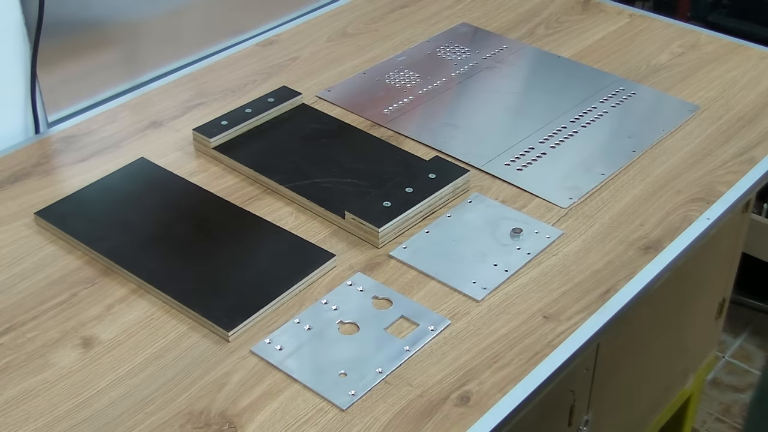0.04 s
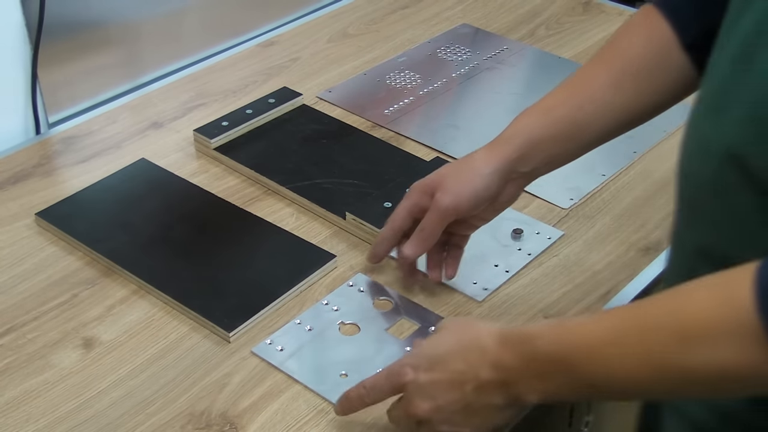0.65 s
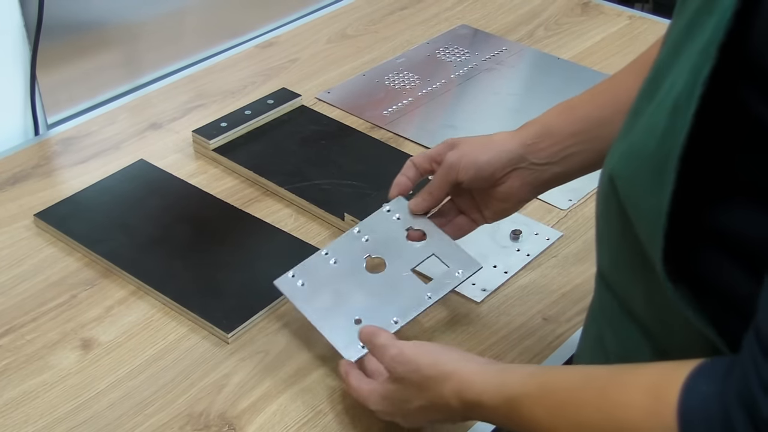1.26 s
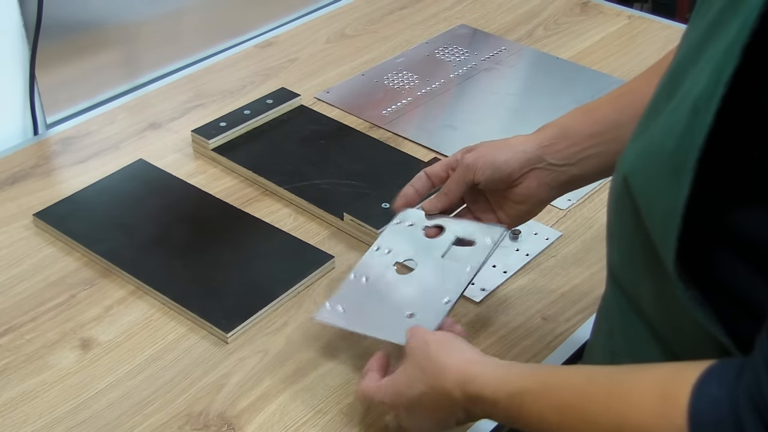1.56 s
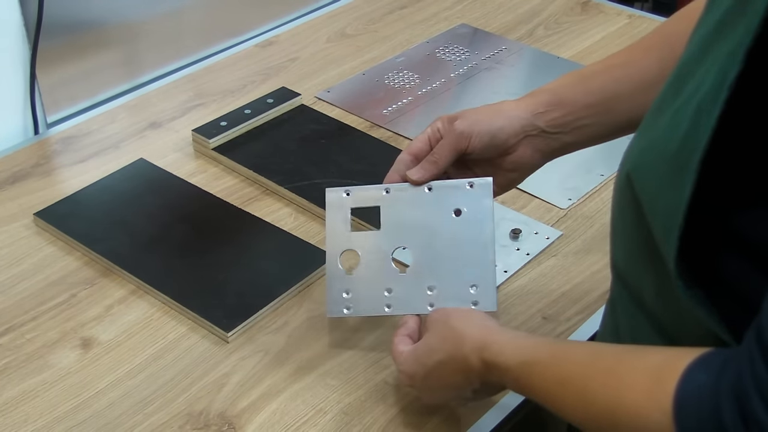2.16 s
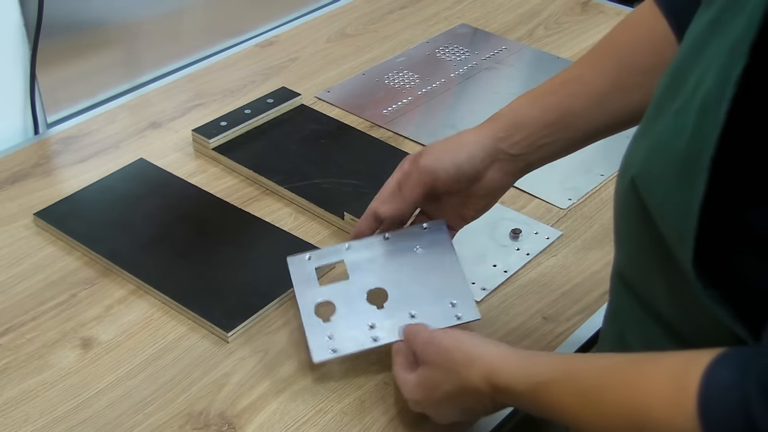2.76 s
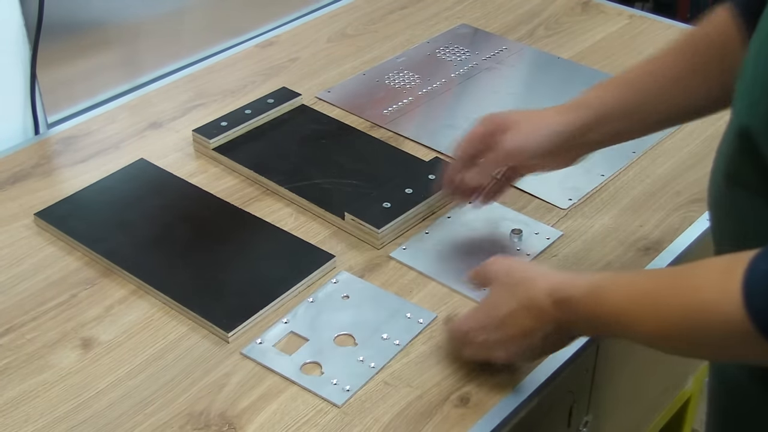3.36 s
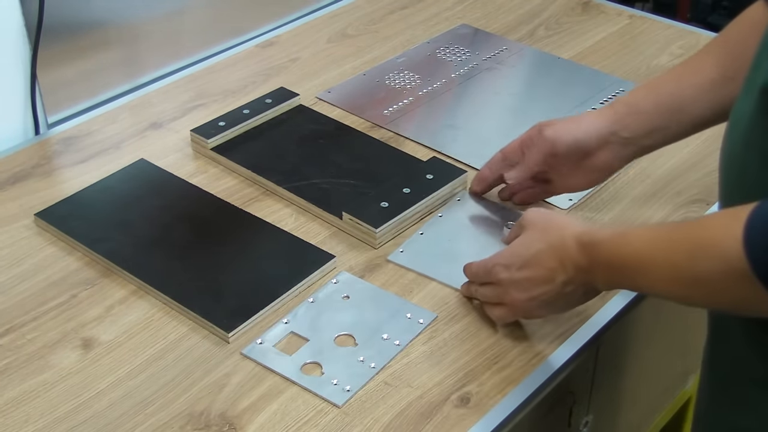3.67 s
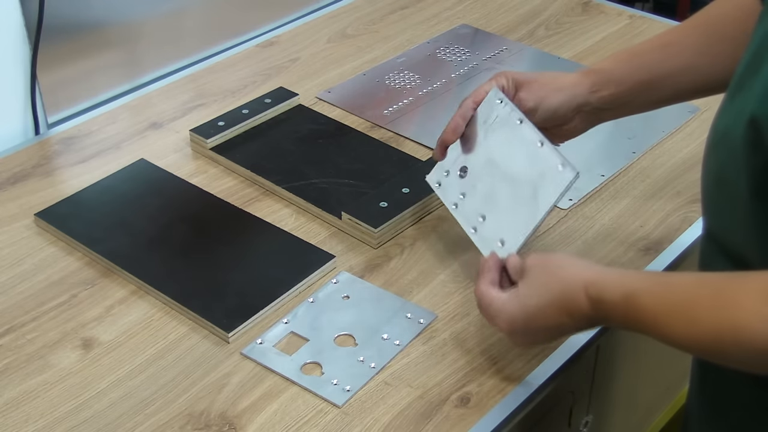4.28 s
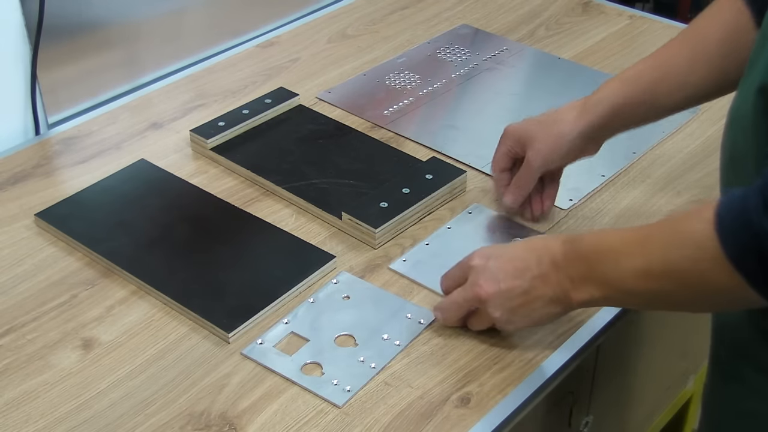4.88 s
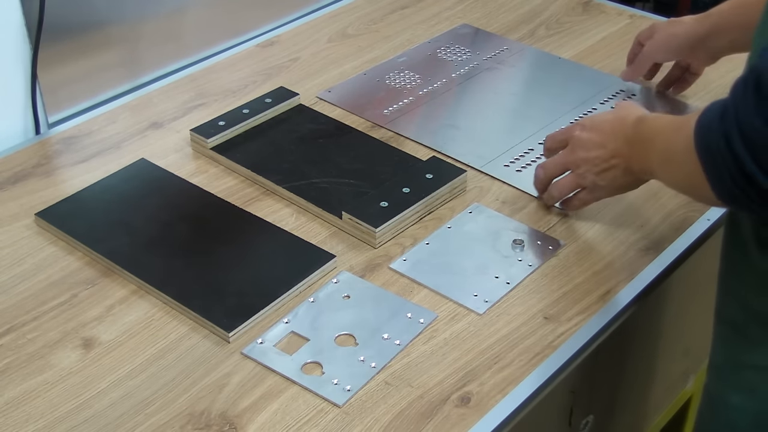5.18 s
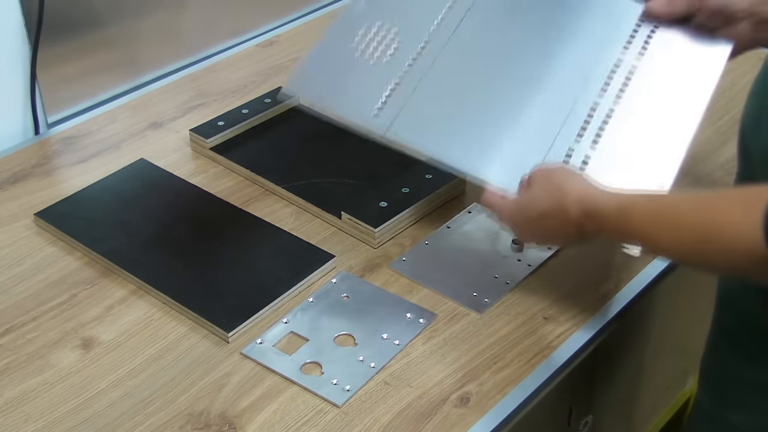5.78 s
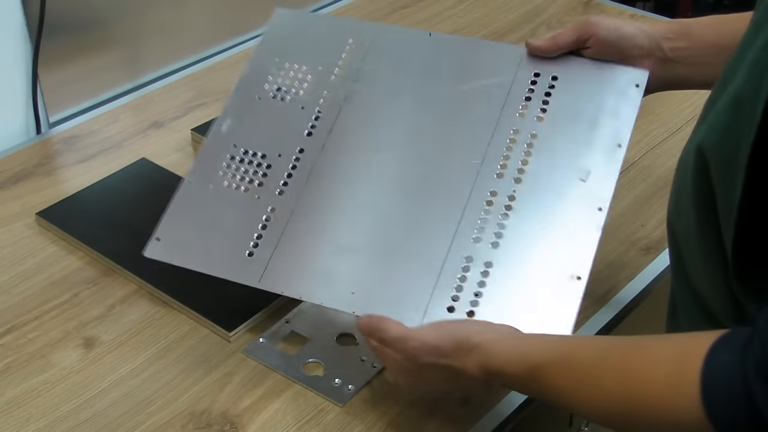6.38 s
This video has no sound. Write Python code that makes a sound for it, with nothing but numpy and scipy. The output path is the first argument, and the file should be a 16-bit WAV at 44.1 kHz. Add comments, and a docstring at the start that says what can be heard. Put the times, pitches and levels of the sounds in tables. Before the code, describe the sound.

Small metal plates are handled and set down on a wooden bench with ringing clatters, then a thin sheet scrapes and slides away.

```python
"""A quiet workshop: aluminium plates are picked up from a wooden bench, turned over and laid down again.
Two small plates sing under the fingertips, then rock and clatter as they land, thudding the wood.
A large thin sheet is dragged off the bench and hisses through the hands. Blows and the tiny slips of
friction set the metal's modes ringing. Sleeves rustle, and the small room adds a short tail."""
import sys
import numpy as np
from scipy import signal
from scipy.fft import rfft, irfft
from scipy.io import wavfile
from scipy.ndimage import uniform_filter1d

SR = 44100
rng = np.random.default_rng(int(sys.argv[2]) if len(sys.argv) > 2 else 0)


def transcribe(u):
    """Save the signal u as a 16-bit wav file named by the first command-line argument.

    u: samples, shape (n,) or (channels, n), limited to [-1, 1]; the rate is SR.
    q: integer samples, one column per channel.
    """
    v = np.clip(np.atleast_2d(u).T, -1, 1)
    q = np.round(v * 32767).astype(np.int16)
    wavfile.write(sys.argv[1], SR, q)


N = 284004
TIME = np.arange(N) / SR
AGE = np.arange(16000) / SR   # seconds since a contact

# Modes of the plate with cut-outs, the plain plate and the large sheet.
# Each row: pitch in Hz, level in dB lying on the bench, level in dB held in the fingers.
CUT_PLATE = [(1719, -1, -1), (1790, -5, -14), (2850, -7, -6), (3273, -4, -5), (3385, -6, -8),
             (3563, -7, -18), (3883, 1, -14), (4277, -2, -5), (4330, -7, -16), (5196, -1, -9),
             (5345, -6, -8), (5500, -8, -14), (5700, -6, -8), (5960, -7, -10), (6080, -11, -11),
             (7510, -13, -15), (8850, -17, -13), (9535, -10, -14), (10420, -14, -19), (10800, -17, -20),
             (11600, -18, -21), (12700, -20, -24), (13500, -20, -23)]
PLAIN_PLATE = [(1148, 3, -4), (1840, -4, -1), (2389, -1, -13), (3090, -2, -6), (3405, 0, -2),
               (3486, -2, -4), (3570, -7, -3), (3742, -6, -16), (3981, -2, -8), (4282, -3, -15),
               (4380, -3, -8), (4510, -1, -13), (5020, -7, -18), (5453, -2, -9), (5770, -8, -3),
               (6025, -5, -10), (6190, -10, -7), (7780, -12, -14), (8620, -16, -14), (8950, -14, -14),
               (10200, -14, -23), (11018, -11, -21), (12100, -17, -21), (12900, -18, -25)]
SHEET = [(505, -3, -10), (590, -8, -12), (680, 0, -8), (788, -1, -2), (1017, -7, -8), (1545, -7, -7),
         (2150, -12, -9), (3060, -14, -13), (4030, -15, -13), (5020, -16, -14), (5314, -16, -14),
         (5480, -16, -14), (5770, -16, -14)]
PLATES = [CUT_PLATE, PLAIN_PLATE, SHEET]
LYING, HELD = 1, 2   # level columns of the modes
# The times in seconds at which the plain plate, then the sheet, take over.
NEXT_PLATE_S = [3.45, 5.05]

# Tone colours. Each row: frequency in Hz, spectral level in dB.
ROOM_TONE = [(15, -59), (25, -15), (96, -10.5), (173, -6), (246, -14), (297, -8.5), (399, 0), (684, -21.5),
             (741, -7), (1200, -24.5), (1490, -41), (2850, -20), (3630, -23), (6050, -14), (15500, -44)]
CLOTH = [(47, -20), (80, -6.5), (328, -14), (400, 0.5), (436, -2), (487, -3.5), (864, -9), (1500, -9),
         (1670, -8), (7010, -12.5), (15500, -17)]
BENCH_THUD = [(25, -37), (60, -17), (120, -8), (165, -11), (205, -28.5), (265, -2), (305, -29.5), (358, -6),
              (420, -1.5), (520, -6.5), (750, -12), (1200, -14), (4000, -56.5)]
RASP = [(150, -85), (600, 2), (1200, 6), (2500, 1), (4000, 3.5), (5800, 5), (7200, -8.5), (11000, -7.5),
        (15500, -13)]
PLATE_HISS = [(400, 4), (1500, 4), (5500, 4), (7000, 0.5), (10000, -5), (15500, -5)]
SHEET_HISS = [(200, -7), (800, -7), (2500, -4.5), (5500, -0.5), (7200, -7.5), (10500, -4), (14000, 1.5),
              (16000, -5)]
CLACK = [(150, -26), (500, -0.5), (1300, -1.5), (2200, -3), (3800, 1.5), (5800, -2), (7200, -11.5),
         (11500, -10), (15500, -13)]
# Stereo width. Each row: frequency in Hz, gain of the side signal in dB.
WIDTH = [(30, -10), (100, -13.5), (300, -14.5), (1000, -13.5), (4500, -9.5), (9000, -6.5), (15000, -4.5)]
# Stereo balance. Each row: frequency in Hz, left over right in dB.
LEFT_LEAN = [(100, -0.2), (500, -0.8), (1800, -0.8), (5000, -0.5), (13000, 1.7)]

# Sleeves and apron. Each row: time in seconds, level in dB.
RUSTLE = [(0, -70), (.47, -64.5), (.72, -69), (1.05, -67), (1.42, -71.5), (2.3, -70), (2.68, -72),
          (3.0, -66), (4.3, -68.5), (5.05, -64), (6.44, -67)]
# Fingers feel along the bench for a plate's edge. Each row: start and end in seconds, level in dB.
GROPES = [(0.869, 1.056, -68), (3.518, 3.60, -59.5), (3.667, 3.925, -62), (5.158, 5.304, -58.5)]
# Drags and brushes over the wood: mostly a plate's metal, a few by a hand or sleeve. Each row: centre and half
# length in seconds, then rasp, ring and bench in dB.
SCRAPES = [(0.557, .016, -46, -64, -52), (1.097, 0.015, -74, -76, -65), (1.138, 0.007, -43, -48.5, -62),
           (3.182, 0.066, -54, -56, -63.5), (3.28, 0.012, -27.5, -31.5, -41),
           (3.799, 0.014, -43.5, -51.5, -52.5), (3.855, 0.021, -49, -43, -50.5),
           (4.811, 0.0043, -35, -57, -44), (5.226, .008, -53, -69, -69), (5.446, 0.036, -52, -62, -61.5),
           (5.553, 0.025, -48.5, -44.5, -56), (5.684, 0.034, -64, -57, -66)]
# How each plate answers to skin. Each row: ring in dB, hiss in dB, ring brightness in dB per octave.
SKIN_ON_PLATE = [(-2, -4, 6.5), (0, -5, 1), (-9, 3, 1.5)]
# A fingertip shifts its grip. Each row: time in seconds, level in dB, extra brightness in dB per octave.
REGRIPS = [(1.097, -53.5, -1), (1.264, -65, 2), (1.666, -56, -6.5), (2.05, -58.5, -4.5), (2.115, -65.5, 2),
           (2.278, -64, -8.5), (4.006, -54.5, 1), (4.082, -53.5, 1.5), (4.186, -64.5, 2), (4.249, -65.5, 3),
           (4.392, -53.5, 3), (4.483, -59.5, 1), (4.538, -58, -1), (4.644, -59, 0.5), (4.702, -57.5, 1.5),
           (4.787, -52.5, 1.5)]
# The first plate turns in the fingers; the sheet slides through the hands.
# Each row: time in seconds, rubbing level in dB.
TURN = [(1.5, -97), (1.548, -96), (1.556, -66), (1.642, -60.5), (1.79, -53.5), (1.896, -67.5), (1.932, -90),
        (1.95, -76)]
SHEET_SLIDE = [(5.38, -84), (5.43, -44), (5.488, -61.5), (5.518, -43), (5.556, -47), (5.61, -104),
               (5.636, -104), (5.654, -53.5), (5.742, -75), (5.76, -57), (5.804, -51.5), (5.866, -77.5),
               (6.016, -58), (6.058, -69.5), (6.158, -56.5), (6.186, -68.5), (6.31, -63.5), (6.44, -60)]
# Long slides. Each row: level curve, brightening as the grip moves in dB per octave each second.
SLIDES = [(TURN, 25), (SHEET_SLIDE, -7)]
# A plate or a hand knocks on the bench.
# Each row: start in seconds, then ring, clack and thud in dB, favoured pitch in Hz.
KNOCKS = [(0.540, -76, -57, -66, 800), (0.780, -85, -59, -60, 1280), (1.089, -52.5, -51, -61, 7200),
          (1.137, -48.5, -39, -47.5, 2690), (1.971, -59.5, -58, -92, 7500), (3.1029, -30, -28.5, -55, 5500),
          (3.11, -25, -33, -51, 1200), (3.646, -69, -52, -47, 3260), (3.784, -41.5, -49, -64, 2630),
          (3.968, -63, -55, -67, 4500), (5.148, -64, -52.5, -46.5, 1470), (5.2314, -46.5, -44.5, -66, 6460),
          (5.387, -53, -53.5, -61, 3860), (5.648, -49.5, -54, -64, 795)]
# A small plate is laid down. Each row: first edge, far edge and flat slap in seconds,
# blow and rocking levels in dB, favoured pitch of the rocking in Hz.
LANDINGS = [(3.2744, 3.288, 3.311, -28.5, -31, 4000), (4.8167, 4.879, 4.913, -21.5, -27, 1300)]
# Stages of a landing: ring, clack and thud in dB against the blow or the rocking; favoured pitch in Hz.
EDGE_DB, EDGE_HZ = (2, -2, -11.5), 4700
ROCK_DB = (0, -2.5, -14)
FAR_EDGE_DB, FAR_EDGE_HZ = (9, 1, -12), 4500
FLAT_DB, FLAT_HZ = (-15.5, 0, -9), 4970
BOUNCE_DB, BOUNCE_HZ = (-13.5, -5, -7), 2220

ROCK_EVERY_S, BOUNCE_EVERY_S, BOUNCE_LOSS_DB = .0125, .0105, 7.5
CLACK_T60, BENCH_T60, LYING_T60, HELD_T60 = 0.14, 0.13, 0.13, 0.078   # seconds to fall 60 dB
TICK_DB, TICK_S, RING_RISE_S = -2, .0004, .0012
STROKE_HALF_S, REGRIP_HALF_S = .012, .017


def from_db(db):
    """Decibels to gain."""
    return 10 ** (np.asarray(db) / 20)


def unit_power(x):
    """Scale to unit power."""
    return x / np.sqrt(np.mean(x ** 2) + 1e-20)


def colour(x, spectrum, extra_db=lambda hz: 0):
    """Equalise by a (Hz, dB) outline plus a further dB curve."""
    hz = np.maximum(np.fft.rfftfreq(x.shape[-1], 1 / SR), 1)
    corner_hz, db = np.transpose(spectrum)
    gain = from_db(np.interp(np.log(hz), np.log(corner_hz), db) + extra_db(hz))
    return irfft(rfft(x) * gain, x.shape[-1])


def noise(spectrum, size=len(AGE), extra_db=lambda hz: 0):
    """Coloured noise as a (mid, side) pair of unit power."""
    return unit_power(colour(rng.standard_normal((2, size)), spectrum, extra_db))


def fade(t60):
    """Exponential decay after a contact."""
    return from_db(-60 * AGE / t60)


def add(track, s, sound):
    """Mix a sound into a track from time s."""
    start = round(s * SR)
    track[:, start:start + sound.shape[1]] += sound[:, :N - start]


def room_and_sleeves(flutter_db=-1.5, room_db=-78.5, diffuse_db=5.5):
    """Cloth rustles unevenly with the arms over a steady room tone that arrives from all sides."""
    folds = unit_power(uniform_filter1d(rng.standard_normal(N), size=1200))
    cloth = from_db(np.interp(TIME, *np.transpose(RUSTLE)) + flutter_db * folds) * noise(CLOTH, N)
    mid, side = cloth + from_db(room_db) * noise(ROOM_TONE, N)
    return np.array([mid, side * from_db(diffuse_db)])


def bench(mode_hz=360.4, mode_t60=0.11, mode_db=-1.5):
    """The wooden top answers with a dull, dense thud and one stronger mode."""
    phase = 2 * np.pi * rng.random((2, 1))
    mode = np.sqrt(2) * np.sin(2 * np.pi * mode_hz * AGE + phase) * fade(mode_t60)
    return noise(BENCH_THUD) * fade(BENCH_T60) + from_db(mode_db) * mode


def friction(half_s, grain_db):
    """Force of one stroke: tiny slips of uneven size that swell and die, centred in its span."""
    grip = unit_power(uniform_filter1d(rng.standard_normal(len(AGE)), size=32))
    slips = rng.standard_normal(len(AGE)) * from_db(grain_db * grip)
    swell = np.exp(-.5 * ((AGE - AGE.mean()) / half_s) ** 2)
    return unit_power(slips * swell) * np.sqrt(np.mean(swell ** 2))


def driven(force, response):
    """A body's answer to a force, at about the power of the force."""
    return signal.fftconvolve(force[None], response / np.sqrt(np.sum(response[0] ** 2)), axes=1)


def stroke_times(start, end):
    """A long movement is a chain of short strokes, overlapping so that their power stays even."""
    return np.arange(start, end, STROKE_HALF_S * np.sqrt(np.pi))


def fingers_on_wood(grain_db=3.5, uneven_db=-2.0, rasp_db=1.0, rasp_t60=0.12):
    """Fingers press unevenly along the wood: it rasps and rumbles, and no metal rings."""
    out = np.zeros((2, N))
    for start, end, db in GROPES:
        for s in stroke_times(start, end):
            force = from_db(db + uneven_db * rng.standard_normal()) * friction(STROKE_HALF_S, grain_db)
            rasp = driven(force, noise(RASP) * fade(rasp_t60))
            add(out, s - AGE.mean(), driven(force, bench()) + from_db(rasp_db) * rasp)
    return out


def plate_at(s):
    """Index of the plate being handled at time s."""
    return np.searchsorted(NEXT_PLATE_S, s)


def upper_modes(depth_db=11.0, spacing_hz=70.58, full_depth_hz=6500):
    """Countless upper modes ripple each plate's treble; gives a dB curve for the plate at time s."""
    ripples = rng.standard_normal((len(PLATES), 600))
    grid_hz = np.arange(ripples.shape[1]) * spacing_hz

    def ripple(s, hz):
        depth = depth_db * np.minimum(hz / full_depth_hz, 1) ** 2
        return depth * np.interp(hz, grid_hz, ripples[plate_at(s)])
    return ripple


def plate_ring(s, t60, support, emphasis_db, scatter_db=2.0, detune=0.0011):
    """The plate rings on: bench or fingers damp some modes, and each contact point favours others."""
    modes = np.array(PLATES[plate_at(s)])
    hz = modes[:, 0] * (1 + detune * rng.standard_normal(len(modes)))   # the contact loads each mode
    gain = from_db(modes[:, support] + emphasis_db(hz) + scatter_db * rng.standard_normal(len(hz)))
    phase = np.exp(2j * np.pi * rng.random((2, len(hz))))
    partials = np.exp(2j * np.pi * np.outer(hz, AGE))
    return unit_power(np.imag((gain * phase) @ partials)) * fade(t60)


def skin_strokes():
    """Grip shifts and slides as strokes: centre and half length in seconds, dB, extra dB per octave."""
    strokes = [(s, REGRIP_HALF_S, db, brighter) for s, db, brighter in REGRIPS]
    for curve, brightening in SLIDES:
        times, levels = np.transpose(curve)
        for s in stroke_times(times[0], times[-1]):
            brighter = brightening * (s - times.mean())
            strokes.append((s, STROKE_HALF_S, np.interp(s, times, levels), brighter))
    return strokes


def skin_on_metal(ripple, grain_db=7.5, hiss_t60=0.088):
    """Dry skin hisses on the lifted plate and keeps its modes singing."""
    out = np.zeros((2, N))
    for s, half_s, db, brighter in skin_strokes():
        ring_db, hiss_db, brightness = SKIN_ON_PLATE[plate_at(s)]
        force = from_db(db) * friction(half_s, grain_db)
        ring = plate_ring(s, HELD_T60, HELD, lambda hz: (brightness + brighter) * np.log2(hz))
        if s > NEXT_PLATE_S[1]:   # the large sheet's modes lie so close that its hiss is smooth
            hiss = noise(SHEET_HISS)
        else:
            hiss = noise(PLATE_HISS, extra_db=lambda hz: ripple(s, hz))
        start = s - AGE.mean()
        add(out, start, from_db(ring_db) * driven(force, ring))
        add(out, start, from_db(hiss_db) * driven(force, hiss * fade(hiss_t60)))
    return out


def scrapes(grain_db=-0.5, rasp_t60=0.054, db_per_octave=-3.5):
    """Dragging rasps and shakes both the plate and the bench."""
    out = np.zeros((2, N))
    for s, half_s, rasp_db, ring_db, bench_db in SCRAPES:
        force = friction(half_s, grain_db)
        ring = plate_ring(s, LYING_T60, LYING, lambda hz: db_per_octave * np.log2(hz))
        start = s - AGE.mean()
        add(out, start, from_db(rasp_db) * driven(force, noise(RASP) * fade(rasp_t60)))
        add(out, start, from_db(ring_db) * driven(force, ring))
        add(out, start, from_db(bench_db) * driven(force, bench()))
    return out


def landing_blows(jitter=.15, scatter_db=-4.5, scatter_octaves=0.1, bounces=2):
    """A plate lands on one edge, rocks to the other, slaps flat and bounces; gives rows like KNOCKS."""
    blows = []
    for edge_s, far_edge_s, flat_s, blow_db, rocking_db, rocking_hz in LANDINGS:
        blows.append((edge_s, *np.add(EDGE_DB, blow_db), EDGE_HZ))
        for s in np.arange(edge_s + ROCK_EVERY_S, flat_s - ROCK_EVERY_S / 2, ROCK_EVERY_S):
            late, softer, higher = rng.standard_normal(3)
            levels = np.add(ROCK_DB, rocking_db + scatter_db * softer)
            favoured_hz = rocking_hz * 2 ** (scatter_octaves * higher)
            blows.append((s + jitter * ROCK_EVERY_S * late, *levels, favoured_hz))
        blows.append((far_edge_s, *np.add(FAR_EDGE_DB, rocking_db), FAR_EDGE_HZ))
        blows.append((flat_s, *np.add(FLAT_DB, blow_db), FLAT_HZ))
        for k in range(bounces):
            levels = np.add(BOUNCE_DB, blow_db - k * BOUNCE_LOSS_DB)
            blows.append((flat_s + (k + 1) * BOUNCE_EVERY_S, *levels, BOUNCE_HZ))
    return blows


def knocks(ripple, focus_db=8.0, thud_rise_s=0.0063, treble_hz=7000, treble_t60=0.12):
    """Each blow layers a hard tick, a dense clack dying in the room, ringing metal and a bench thud."""
    out = np.zeros((2, N))
    lowpass = signal.butter(2, treble_hz, fs=SR, output="sos")
    for s, ring_db, clack_db, thud_db, favoured_hz in KNOCKS + landing_blows():
        def contact_db(hz):
            """The point and hardness of the contact favour one range of pitch."""
            octaves = np.log2(hz / favoured_hz)
            return -focus_db * octaves ** 2 / np.hypot(1, octaves)

        ring = plate_ring(s, LYING_T60, LYING, contact_db) * (1 - np.exp(-AGE / RING_RISE_S))
        burst = noise(CLACK, extra_db=lambda hz: contact_db(hz) + ripple(s, hz))
        body = signal.sosfiltfilt(lowpass, burst)
        tick = from_db(TICK_DB) * burst * np.exp(-AGE / TICK_S)
        clack = tick + body * fade(CLACK_T60) + (burst - body) * fade(treble_t60)   # treble dies first
        thud = bench() * (1 - np.exp(-AGE / thud_rise_s))
        add(out, s, from_db(ring_db) * ring + from_db(clack_db) * clack + from_db(thud_db) * thud)
    return out


def scene(low_cut_hz=70):
    """Small bodies radiate little bass; two close microphones hear lows alike and the treble apart."""
    ripple = upper_modes()
    contacts = knocks(ripple) + scrapes() + fingers_on_wood() + skin_on_metal(ripple)
    low_cut = signal.butter(2, low_cut_hz, "high", fs=SR, output="sos")
    mid, side = signal.sosfilt(low_cut, contacts) + room_and_sleeves()
    side = colour(side, WIDTH)
    lean = (colour(mid, LEFT_LEAN) - mid) / 2
    return np.array([mid + side + lean, mid - side - lean])


def record(dry, cutoff_hz=15900):
    """A steep low-pass takes off the very top."""
    return signal.sosfilt(signal.ellip(10, .1, 80, cutoff_hz, fs=SR, output="sos"), dry)


dry = scene()
out = record(dry)
transcribe(out)
```